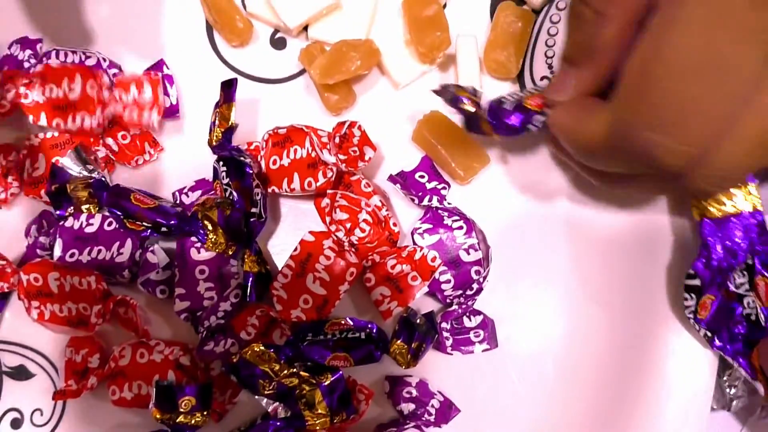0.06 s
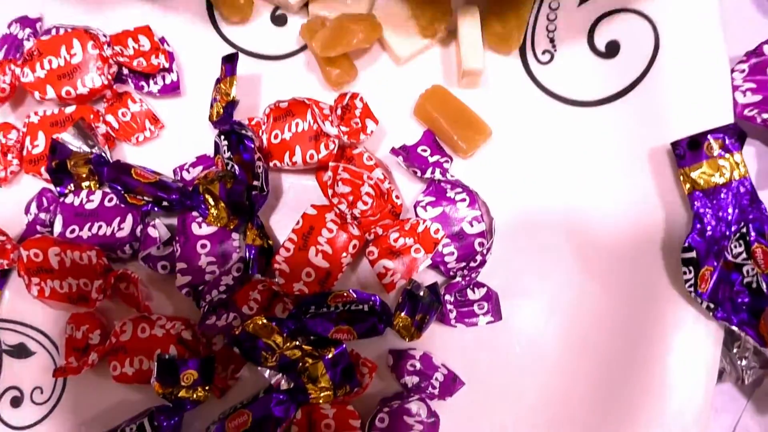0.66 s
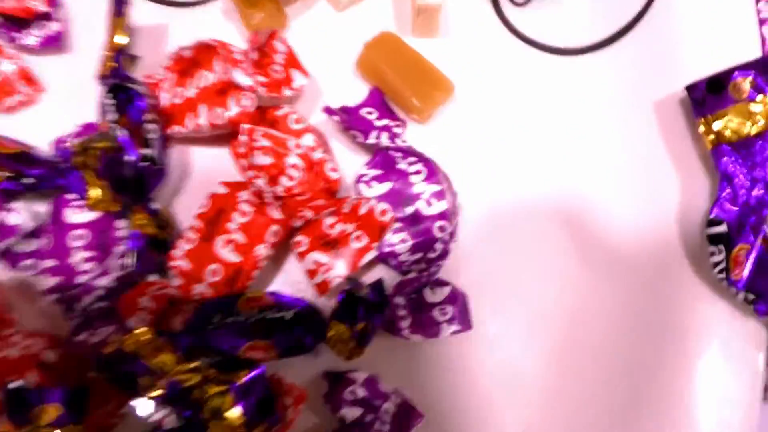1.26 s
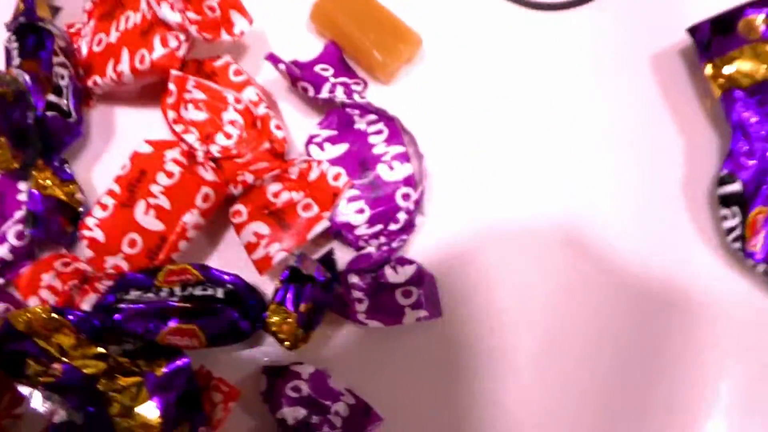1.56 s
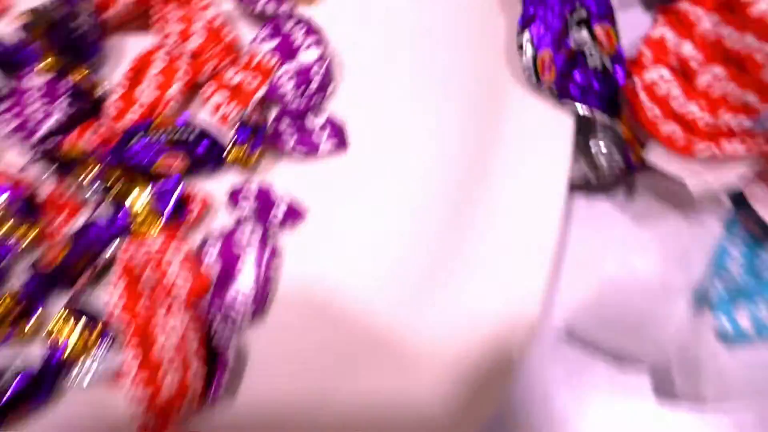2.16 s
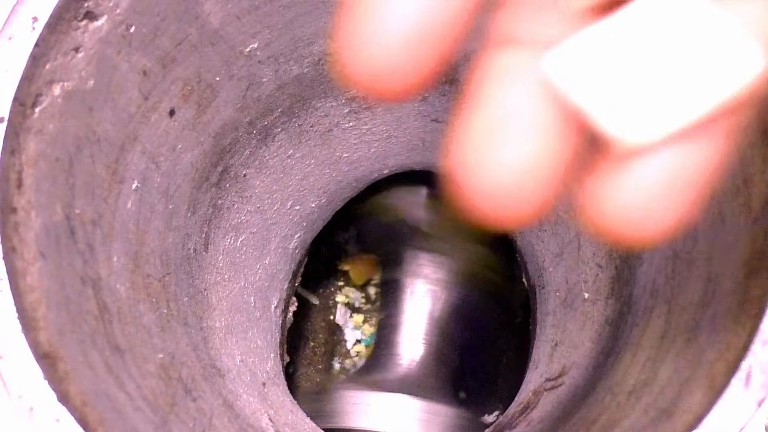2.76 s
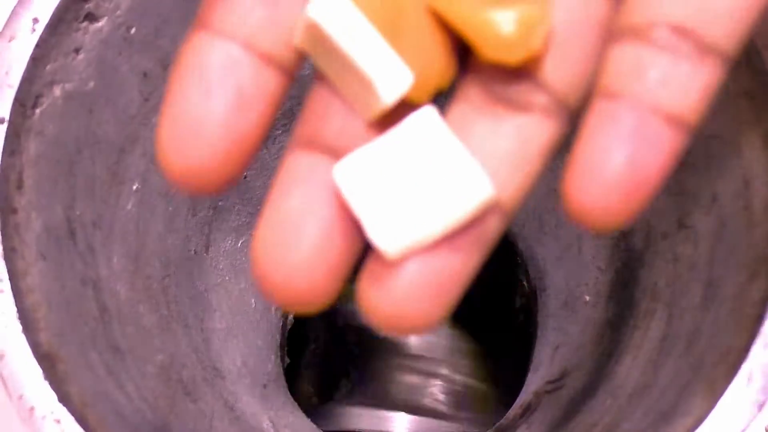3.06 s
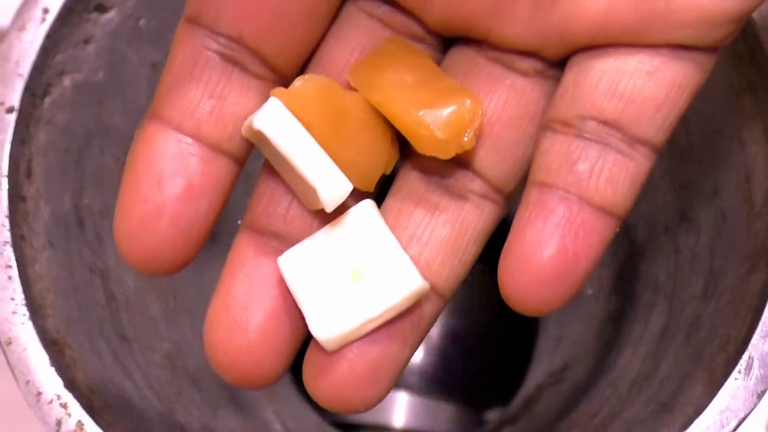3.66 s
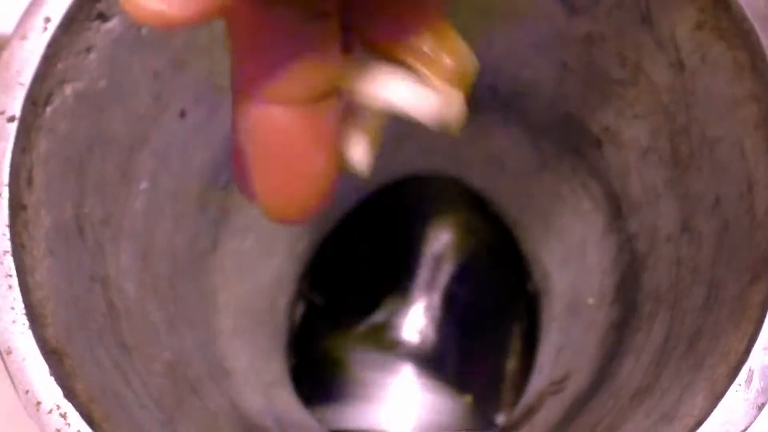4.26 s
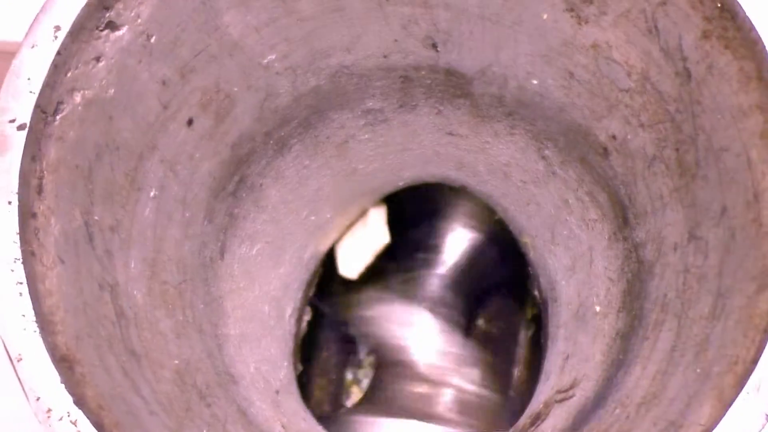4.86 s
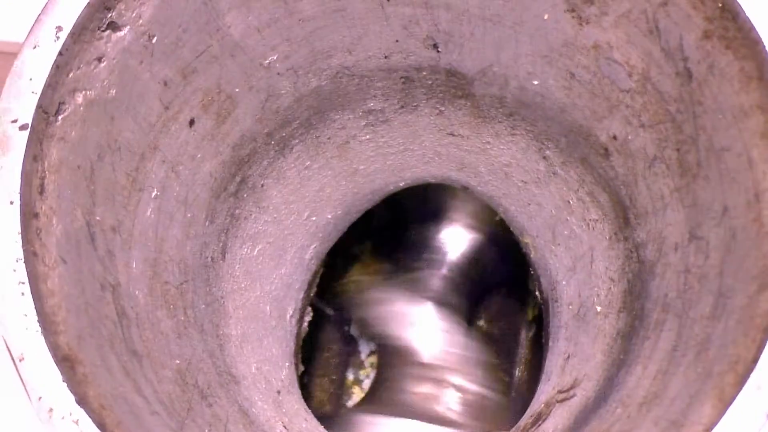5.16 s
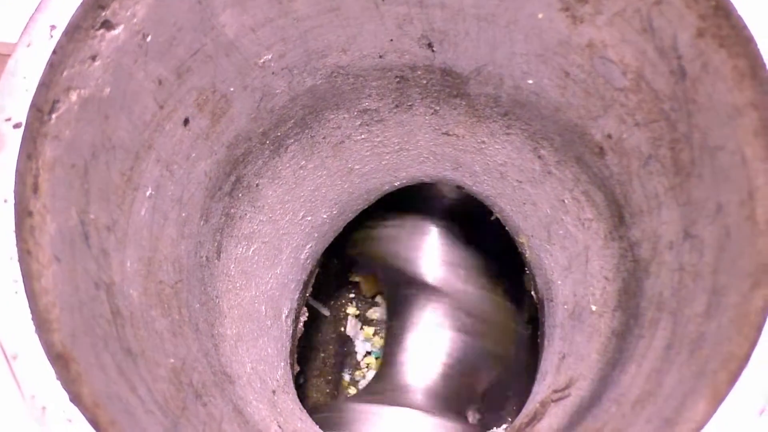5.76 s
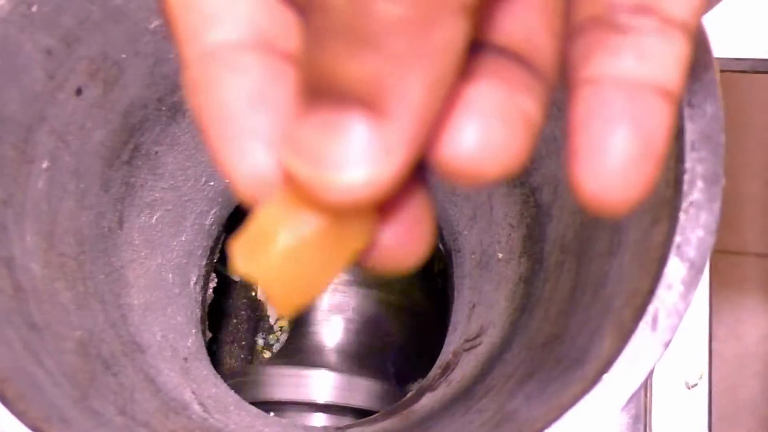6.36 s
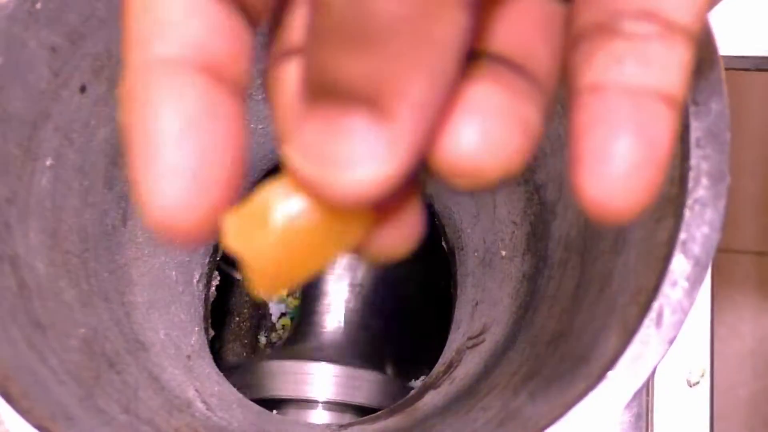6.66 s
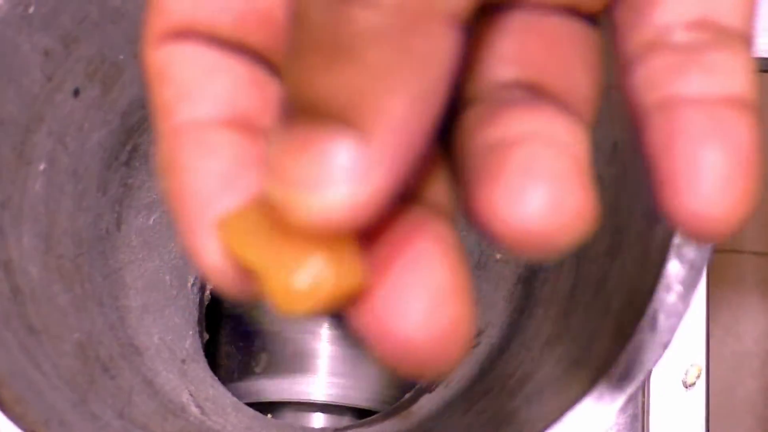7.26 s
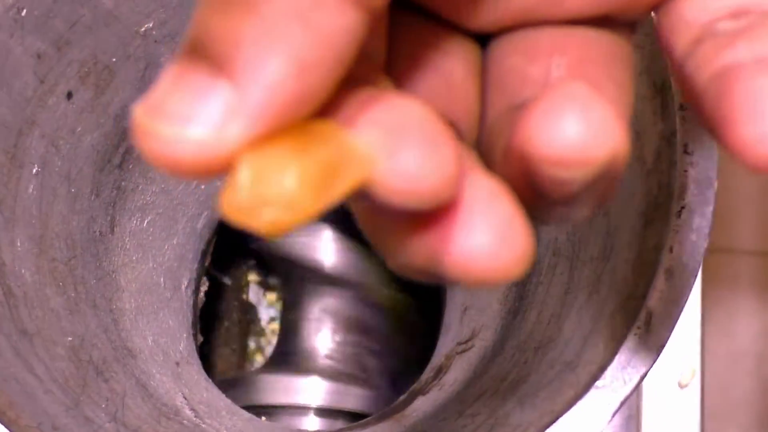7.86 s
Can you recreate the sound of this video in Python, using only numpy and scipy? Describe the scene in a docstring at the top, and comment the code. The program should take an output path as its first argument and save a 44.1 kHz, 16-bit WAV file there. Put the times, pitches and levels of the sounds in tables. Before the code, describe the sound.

Close, crisp crinkling and snapping of candy wrappers comes first, with two soft brushes of a hand on a plate. Then an electric meat grinder abruptly takes over, already running indoors, with the microphone right above the feed throat. The motor hums and hisses steadily, the gears rattle the housing and the auger ticks against the metal barrel. Midway, candies click on the metal and are cracked, leaving a faint gritty scraping.

```python
"""A quiet room with a low drone. Close by, foil and plastic candy wrappers crackle as their creases snap,
and a hand brushes twice over a plate. The scene cuts to a running electric meat grinder, heard from
just above its feed throat: the motor hisses, the gears rattle the housing, the auger knocks in its
barrel, and candies drop in and are crushed."""
import sys
import numpy as np
from scipy import signal
from scipy.fft import rfft, irfft
from scipy.io import wavfile

SR = 44100
rng = np.random.default_rng(int(sys.argv[2]) if len(sys.argv) > 2 else 0)


def materialize(psi):
    """Save the field psi as 16-bit PCM at rate SR to the path in sys.argv[1].

    A 1-D psi becomes a single channel; in a 2-D psi each row is a channel.
    """
    bounded = np.clip(np.atleast_2d(psi).T, -1, 1)
    quanta = np.round(bounded * 32767).astype(np.int16)
    wavfile.write(sys.argv[1], SR, quanta)


N = 352800
T = np.arange(N) / SR
HZ = np.fft.rfftfreq(N, 1 / SR)
CUT_S, BAND_EDGE_HZ = 2.216, 16000


def gain_of(db):
    """Decibels to amplitude."""
    return 10 ** (np.asarray(db) / 20)


def unit_rms(x):
    """Scales to rms 1."""
    return x / np.sqrt(np.mean(x ** 2) + 1e-20)


def curve_at(points, hz):
    """Interpolates on a log-frequency axis."""
    freqs, values = np.transpose(points)
    return np.interp(np.log(hz + 1), np.log(freqs + 1), values)


def add(mix, start_s, sound):
    """Mixes a sound in at start_s."""
    part = mix[max(round(start_s * SR), 0):][:len(sound)]
    part += sound[:len(part)]


def colour(x, gain):
    """Minimum-phase filter, one gain per bin: rings only after the blow."""
    cepstrum = irfft(np.log(np.maximum(gain, 1e-5)), len(x))
    cepstrum[1:len(x) // 2] *= 2
    cepstrum[len(x) // 2 + 1:] = 0
    return irfft(rfft(x) * np.exp(rfft(cepstrum)), len(x))


def shaped(x, spectrum):
    """Filters by a spectrum table; rms 1."""
    return unit_rms(colour(x, gain_of(curve_at(spectrum, HZ))))


def drift(rate_hz):
    """Random wander up to about rate_hz; rms 1."""
    return unit_rms(irfft(rfft(rng.standard_normal(N)) * np.exp(-(HZ / rate_hz) ** 2), N))


def swells(rows, attack_s, fall_db_per_s):
    """Envelope of (start [s], length [s], level [dB]) events: rise, hold, decay."""
    t = T[::32]
    start, length, db = np.transpose(rows)[:, :, None]
    rise = np.clip((t - start) / attack_s, 0, 1)
    fall_db = fall_db_per_s * np.maximum(t - start - length, 0)
    return np.interp(T, t, np.linalg.norm(rise * gain_of(db - fall_db), axis=0))


def clicks(per_s, spread_db):
    """Random clicks of either sign: many small, a few large."""
    hit, out = rng.random(N) < per_s / SR, np.zeros(N)
    draw = rng.uniform(-1, 1, N)[hit]
    out[hit] = np.sign(draw) * gain_of(spread_db * np.minimum(-np.log(abs(draw)), 4))
    return unit_rms(out)


def snap(spectrum, centre_hz, decay_s, grit, focus_db):
    """One break: a click and short chatter ring uneven resonances around centre_hz; energy 1."""
    t = np.arange(2048) / SR
    hz = np.fft.rfftfreq(len(t), 1 / SR)
    push = (t == 0) + grit * rng.standard_normal(len(t)) * np.exp(-t / decay_s)
    skirt_db = -focus_db * np.minimum(np.log2((hz + 1) / centre_hz) ** 2, 1)
    knots_hz = np.geomspace(1000, BAND_EDGE_HZ, 24)
    uneven_db = 4.5 * np.interp(hz, knots_hz, rng.standard_normal(len(knots_hz)))
    sound = colour(push, gain_of(curve_at(spectrum, hz) + skirt_db + uneven_db))
    return sound / np.linalg.norm(sound)


def fractures(rows, spectrum, decay_s, grit, focus_db, span_s):
    """Timed breaks, each with the energy of its level held for span_s."""
    out = np.zeros(N)
    for time_s, db, centre_hz in rows:
        sound = snap(spectrum, centre_hz, decay_s, grit, focus_db)
        add(out, time_s, gain_of(db) * np.sqrt(span_s * SR) * sound)
    return out


def crackle(spectrum, low_hz, per_s, spread_db, decay_s, focus_db, count=24):
    """Many small spots break at random, each with its own ring."""
    out = np.zeros(N)
    for hz in np.geomspace(low_hz, BAND_EDGE_HZ, count):
        breaks = clicks(per_s / count, spread_db)
        ring = snap(spectrum, hz, decay_s, grit=0.94, focus_db=focus_db)
        out += gain_of(curve_at(spectrum, hz)) * np.sqrt(hz) * signal.oaconvolve(breaks, ring)[:N]
    return unit_rms(out)


def room(x, t60_s, wet_db, width):
    """Direct sound plus a short diffuse tail, partly different at each ear."""
    t = np.arange(SR // 2) / SR
    mid, side = rng.standard_normal((2, len(t))) * gain_of(-60 * t / t60_s) * (t > 0.002)
    tail = np.array([mid + width * side, mid - width * side])
    tail /= np.linalg.norm(tail, axis=1, keepdims=True)
    return x + gain_of(wet_db) * signal.fftconvolve(x[None], tail, axes=1)[:, :N]


# Drone envelope: (time [s], level [dB])
DRONE_LEVELS = [(0, -47.5), (.27, -34.5), (.55, -41), (.93, -41.5), (1.02, -51.5), (2.2, -52.5)]
# Drone spectrum: (frequency [Hz], relative level [dB])
DRONE_SPECTRUM = [(25, -24.5), (130, -13.5), (210, -3), (330, -9.5), (550, -24), (2000, -29.5),
                  (14000, -46)]


def room_drone():
    """Soft low noise, slightly different at each ear."""
    mid, side = (shaped(noise, DRONE_SPECTRUM) for noise in rng.standard_normal((2, N)))
    envelope = gain_of(np.interp(T, *np.transpose(DRONE_LEVELS)))
    return envelope * (mid + gain_of(-11.5) * np.array([side, -side]))


# Hand-on-plate spectrum: (frequency [Hz], relative level [dB])
BRUSH_SPECTRUM = [(50, -13), (90, 4), (125, -1), (228, 10), (330, 9.5), (520, 2), (1280, 1.5), (1650, 0.5),
                  (2020, 6.5), (2600, -3), (4200, -8.5), (6000, -41)]
# Hand strokes: (start [s], length [s], level [dB])
HAND_STROKES = [(0.17, 0.098, -35.5), (0.602, 0.071, -32), (1.867, 0.038, -51.5)]


def hand_on_plate():
    """Friction of a hand: a light slide with firmer strokes."""
    friction = shaped(clicks(per_s=5300, spread_db=5), BRUSH_SPECTRUM)
    lift_s, slide_db = 0.83, -55.5
    pressure = swells([(0, lift_s, slide_db), *HAND_STROKES], attack_s=0.012, fall_db_per_s=138)
    return room(friction * pressure, t60_s=0.078, wet_db=2, width=0.69)


# Wrapper spectrum: (frequency [Hz], relative level [dB])
FOIL_SPECTRUM = [(500, -67), (1000, -6), (1800, -4), (2400, 2), (5000, -0.5), (9500, 0.5), (13000, 1.5),
                 (16000, -4.5)]
# Loudest creases: (time [s], level [dB], centre [Hz])
CREASE_SNAPS = [(0.041, -23.5, 3600), (0.232, -12.5, 4020), (0.3358, -22, 6800), (0.351, -16.5, 7800),
                (0.3955, -11.5, 5800), (0.411, -18, 6460), (0.506, -23.5, 6960), (0.56, -13.5, 5040),
                (0.665, -17, 4440), (0.684, -14, 7300), (0.7147, -16, 9900), (0.7245, -14, 9000),
                (0.731, -13, 8600), (0.743, -7, 8460), (0.7975, -13.5, 7300), (0.8158, -22, 8700),
                (0.8626, -8, 9200), (0.869, -21, 9000), (0.912, -19, 10400), (0.9238, -16, 11000),
                (0.942, -10, 6440), (0.965, -17.5, 5670), (1.0075, -15.5, 7760), (1.029, -17, 7040),
                (1.0405, -21, 9000), (1.052, -17.5, 7950), (1.0665, -17.5, 10700), (1.1129, -10.5, 10000),
                (1.116, -13, 7500), (1.1438, -14.5, 4900), (1.2258, -13, 10000), (1.23, -9, 10900),
                (1.408, -10.5, 6700), (1.451, -16, 7960), (1.525, -26, 11000), (1.576, -12, 7050),
                (1.62, -19.5, 9500), (1.63, -19, 6000), (1.668, -19, 10800), (1.705, -15.5, 6650),
                (1.739, -24, 6500), (1.838, -24, 9000), (1.96, -16, 9000), (2.04, -13.5, 8800),
                (2.052, -18.5, 8200), (2.0742, -14, 10200), (2.083, -17, 8500), (2.139, -20, 5470)]
# Whole wrapper buckling: (time [s], level [dB])
BUCKLE_POPS = [(0.396, -16.5), (0.5607, -25), (1.4079, -19)]
# Finger squeezes: (start [s], length [s], level [dB])
FINGER_SQUEEZES = [(0, 0.064, -36), (.3, 0.054, -43), (.66, 0.048, -35.5), (.705, 0.071, -34),
                   (.8, 0.15, -39.5), (.98, 0.081, -39.5), (1.24, 0.1, -32.5), (1.41, 0.17, -34),
                   (1.67, 0.085, -38.5), (1.78, 0.16, -50.5), (1.97, 0.11, -38)]


def wrappers():
    """Creases snap and wrappers buckle with a hollow pop, over fine crackle and foil rubbing on foil."""
    snaps = fractures(CREASE_SNAPS, FOIL_SPECTRUM, decay_s=0.00069, grit=1, focus_db=11, span_s=0.00034)
    pop_hz = 2400
    buckles = [(time_s, db, pop_hz) for time_s, db in BUCKLE_POPS]
    pops = fractures(buckles, FOIL_SPECTRUM, decay_s=0.0014, grit=1, focus_db=40, span_s=0.0004)
    rub = shaped(rng.standard_normal(N), FOIL_SPECTRUM)
    creases = crackle(FOIL_SPECTRUM, low_hz=3240, per_s=650, spread_db=3.6,
                      decay_s=0.0005, focus_db=13, count=64)
    # Crackle peaks around each snap.
    t, strain = np.arange(-0.04, 0.04, 1 / SR), np.zeros(N)
    for time_s, db, _ in CREASE_SNAPS:
        add(strain, time_s + t[0], gain_of(db - 24.5) * np.exp(-abs(t) / 0.0035))
    squeeze = swells(FINGER_SQUEEZES, attack_s=0.0068, fall_db_per_s=259)
    settling = gain_of(-55.5)
    handling = np.hypot(squeeze, settling) * gain_of(5 * np.tanh(drift(90)))
    crinkle = (creases + gain_of(-24) * rub) * (handling + strain)
    sound = snaps + pops + crinkle + gain_of(-60) * rub
    return room(sound, t60_s=0.043, wet_db=-11, width=0.55) * gain_of([[0.25], [-0.25]])


# Motor hiss spectrum: (frequency [Hz], relative level [dB])
HISS_SPECTRUM = [(1500, -5.5), (2700, 15), (3400, 2.5), (4150, 10.5), (4900, -4.5), (6200, 1), (7800, -8),
                 (9500, -3), (15000, -27.5)]
GEAR_HZ = 24.93


def motor_hiss():
    """Brushes and cooling air hiss, fluttering and pulsing lightly at gear speed."""
    hiss = shaped(clicks(per_s=6000, spread_db=2), HISS_SPECTRUM)
    pulse_db = 0.22 * np.cos(2 * np.pi * GEAR_HZ * T)
    flutter_db = 2 * drift(52) + 0.4 * drift(6.3)
    return hiss * gain_of(-44 + pulse_db + flutter_db)


# Breaking candy spectrum: (frequency [Hz], relative level [dB])
CANDY_SPECTRUM = [(900, -26), (2000, 9.5), (3900, 3.5), (6000, -1.5), (8000, -6), (10500, -3.5),
                  (16000, -19)]
# Candies hitting the throat and cracking: (time [s], level [dB], centre [Hz])
CANDY_CRACKS = [(2.455, -26, 6500), (4.405, -27, 9350), (4.427, -23.5, 6040), (4.44, -24, 11500),
                (4.68, -30, 5700), (4.724, -27, 10000), (4.9475, -20, 7040), (5.0266, -25.5, 5900),
                (5.0493, -22, 3020), (5.134, -26, 4000), (5.16, -16.5, 5700), (5.3567, -26, 4370),
                (5.44, -21, 6500), (5.4624, -17.5, 4400), (5.5994, -24, 4500), (5.6847, -24.5, 5700),
                (5.9397, -24, 4250)]
# Auger scraping over grit: (start [s], length [s], level [dB])
GRIT_SCRAPES = [(2.22, 0.55, -47.5), (4.95, 0.29, -42), (5.48, 0.22, -43), (6.3, 0.45, -45.5),
                (7.13, 0.038, -39), (7.65, 0.45, -46.5)]


def candies():
    """Hard pieces crack on the metal; each sheds a burst of crumbs and grit that is slowly ground away."""
    cracks = fractures(CANDY_CRACKS, CANDY_SPECTRUM,
                       decay_s=0.0045, grit=0.9, focus_db=10, span_s=0.0021)
    crumbs = crackle(CANDY_SPECTRUM, low_hz=2100, per_s=850, spread_db=1.7,
                     decay_s=0.0022, focus_db=9, count=32)
    attack_s, shed_s = 0.0019, 0.0075
    shed = [(time_s, shed_s, db) for time_s, db, _ in CANDY_CRACKS]
    burst = gain_of(-17) * swells(shed, attack_s, fall_db_per_s=197)
    grit = gain_of(-24) * swells(shed, attack_s, fall_db_per_s=14)
    scrape = swells(GRIT_SCRAPES, attack_s=0.052, fall_db_per_s=107)
    old_grit = gain_of(-51)
    envelope = np.sqrt(burst ** 2 + grit ** 2 + scrape ** 2 + old_grit ** 2)
    return cracks + crumbs * envelope * gain_of(2.9 * np.tanh(drift(24)))


# Barrel modes: (frequency [Hz], relative level [dB], t60 [s])
BARREL_MODES = [(993, 2, 0.095), (1273, 11, 0.02), (1510, 8.5, 0.027), (1786, 7, 0.037), (2184, 7.5, 0.013),
                (2610, -0.5, 0.016), (2950, 8, 0.0071)]
# Auger knocks, in runs of about 7 per second: (time [s], relative level [dB])
AUGER_KNOCKS = [(2.265, -22.5), (2.401, -23.5), (2.539, -23), (2.676, -32.5), (2.8112, -25), (2.978, -32.5),
                (3.224, -24), (3.358, -28.5), (3.49, -31.5), (3.774, -27), (3.913, -24), (4.045, -25),
                (4.182, -28), (4.3203, -27.5), (4.4598, -21.5), (4.594, -31), (4.7341, -24.5), (4.869, -26),
                (5.144, -25.5), (5.28, -29.5), (5.718, -29.5), (6.928, -33), (7.315, -23)]


def auger():
    """The auger strikes the barrel and rings its modes, over light ticks and bright chatter."""
    t, knocks = np.arange(SR // 8) / SR, np.zeros(N)
    modes = np.array([(-1) ** k * gain_of(db - 60 * t / t60_s) * np.sin(2 * np.pi * hz * t)
                      for k, (hz, db, t60_s) in enumerate(BARREL_MODES)])
    for time_s, db in AUGER_KNOCKS:
        ring = gain_of(rng.standard_normal(len(modes))) @ modes  # each spot favours other modes
        push = (t == 0) + 0.17 * rng.standard_normal(len(t)) * np.exp(-t / 0.005)
        knock = signal.fftconvolve(push, ring)[:len(t)]
        add(knocks, time_s, gain_of(db - 7.3) * unit_rms(knock))
    ticks = unit_rms(signal.oaconvolve(clicks(per_s=30, spread_db=1.5), modes.sum(axis=0))[:N])
    chatter = crackle(CANDY_SPECTRUM, low_hz=1500, per_s=60, spread_db=2.1, decay_s=0.003, focus_db=5)
    return knocks + gain_of(-42.5) * ticks + gain_of(-47.5) * chatter


# Meshing tones: (multiple of gear speed, level [dB])
MESH_TONES = [(8.14, -49.5), (20.05, -39), (20.6, -42.5), (21.5, -43), (22, -35), (25, -33.5), (26, -40.5),
              (27, -37.5), (31, -39), (38.2, -43.5)]


def gear_mesh(turns):
    """Regular meshing gives wavering tones locked to the rotation."""
    tones = np.zeros(N)
    for order, db in MESH_TONES:
        waver = 1 + 0.45 * drift(7)
        tones += gain_of(db) * np.sqrt(2) * waver * np.cos(2 * np.pi * (order * turns + rng.random()))
    return tones


# Teeth catching: (time [s])
THUD_TIMES_S = [2.32, 2.799, 3.319, 3.922, 3.96, 4.001, 4.162, 4.399, 5.368, 5.488, 6.301, 6.584, 6.666,
                7.431, 7.471]


def gear_thuds(length_s=0.016, pitch_hz=630):
    """A catching tooth gives the housing one short, round throb."""
    t, out = np.arange(0, length_s, 1 / SR), np.zeros(N)
    window = np.sin(np.pi * t / length_s) ** 2
    for time_s in THUD_TIMES_S:
        hz = pitch_hz * (1 + 0.035 * rng.standard_normal())
        add(out, time_s - length_s / 2, window * np.cos(2 * np.pi * (hz * t + rng.random())))
    return gain_of(-15) * out


# Housing resonances: (frequency [Hz], width [Hz], relative level [dB])
HOUSING_MODES = [(82.6, 18.7, -7.5), (147.3, 34.4, -9), (200, 81, -14.5), (362.3, 44, -1.5), (428, 47, -4),
                 (513.3, 40, 1), (629, 98, 1), (706, 93, -3), (806.3, 55, 2), (950.6, 26.6, 1),
                 (1271, 25, -4.5), (1396, 54, -11), (1515, 49, -11.5), (2039, 32, -14.5)]
# Broad housing response: (frequency [Hz], relative level [dB])
HOUSING_SPECTRUM = [(35, -73), (70, -30), (290, -18), (480, -11.5), (890, -15.5), (1050, -10), (1200, -14),
                    (1700, -19.5), (2800, -25.5), (3400, -34.5), (8000, -57)]
# Rattle surges: (start [s], length [s], level [dB])
RATTLE_SURGES = [(3.642, .02, -21), (5.04, 0.022, -23), (6.12, 0.13, -34)]


def gear_rattle(turns):
    """Loose teeth rattle the housing, pulsing with each turn and surging briefly under strain."""
    angle = 2 * np.pi * turns
    swing = np.cos(angle) + 0.6 * np.cos(2 * angle) + 0.5 * np.cos(3 * angle)
    teeth = clicks(per_s=1400, spread_db=1.4) * gain_of(1.7 * swing + 0.7 * drift(30))
    mode_power = sum(gain_of(db) ** 2 / (1 + ((HZ - hz) / (0.61 * width_hz)) ** 2) ** 2
                     for hz, width_hz, db in HOUSING_MODES)
    housing = np.sqrt(mode_power + gain_of(curve_at(HOUSING_SPECTRUM, HZ)) ** 2)
    rattle = gain_of(-23.5) * unit_rms(colour(teeth, housing))
    # Upper resonances ring more under strain.
    lift_db, centre_hz, spread_hz = 17, 865, 150
    strained = housing * gain_of(lift_db * np.exp(-((HZ - centre_hz) / spread_hz) ** 2))
    surge = swells(RATTLE_SURGES, attack_s=0.0089, fall_db_per_s=320)
    return rattle + surge * unit_rms(colour(teeth, strained))


def gears(fade_in_s=0.027):
    """The gear train turns at a slightly wandering speed; it fades in at the cut."""
    turns = np.cumsum(GEAR_HZ * (1 + 0.0022 * drift(1.723))) / SR + 0.25
    fade = np.sqrt(np.clip((T - CUT_S) / fade_in_s, 0, 1))
    return fade * (gear_rattle(turns) + gear_mesh(turns) + gear_thuds())


# Grinder balance: (frequency [Hz], left minus right [dB])
GRINDER_BALANCE = [(180, 2), (510, -1.5), (550, -3.5), (625, -1.5), (675, -6.5), (800, -5), (1300, -4.5),
                   (2000, 0.1), (15000, -1.5)]
# Grinder phase: (frequency [Hz], left lead [rad])
GRINDER_PHASE = [(80, -0.18), (480, -0.51), (525, -0.28), (595, -0.73), (950, 0.53), (1280, 0.32),
                 (1600, 0.76), (2100, 0.63), (15000, -0.17)]


def grinder():
    """The machine reaches left and right with a different level and phase at each pitch."""
    body = room(gears(), t60_s=0.09, wet_db=-19.5, width=0.32)
    bright = room(motor_hiss() + auger() + candies(), t60_s=0.11, wet_db=-12.5, width=0.06)
    left = gain_of(curve_at(GRINDER_BALANCE, HZ) / 2) * np.exp(0.5j * curve_at(GRINDER_PHASE, HZ))
    return irfft(rfft(body + bright) * np.array([left, 1 / left]), N)


def scene():
    """Wrappers at the plate, then a hard cut to the grinder."""
    return np.where(T < CUT_S, room_drone() + hand_on_plate() + wrappers(), grinder())


def record(dry):
    """Steep low-pass at the band edge."""
    lowpass = signal.firwin(511, BAND_EDGE_HZ, window=("kaiser", 9), fs=SR)
    return signal.oaconvolve(dry, lowpass[None], "same")


dry = scene()
out = record(dry)
materialize(out)
```